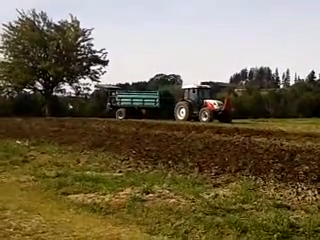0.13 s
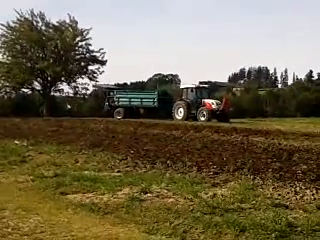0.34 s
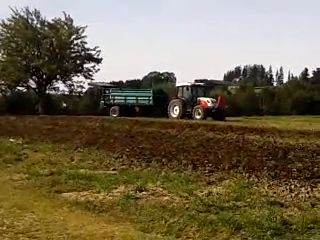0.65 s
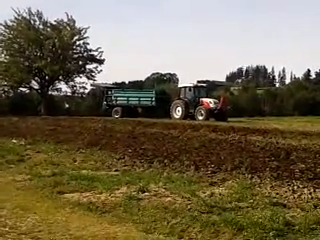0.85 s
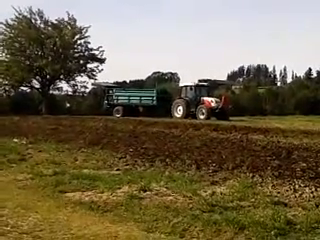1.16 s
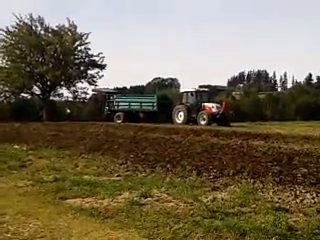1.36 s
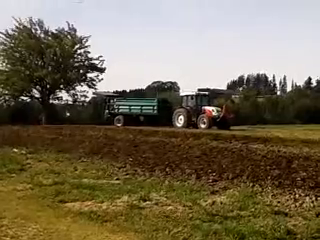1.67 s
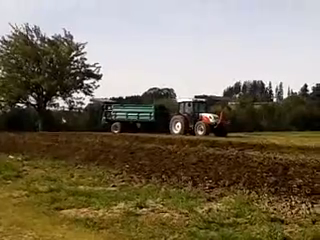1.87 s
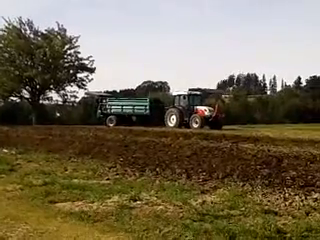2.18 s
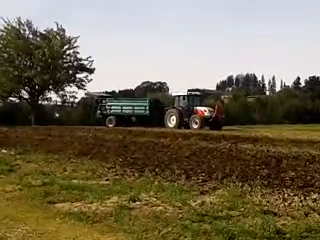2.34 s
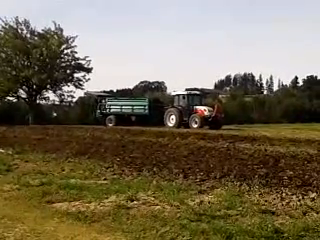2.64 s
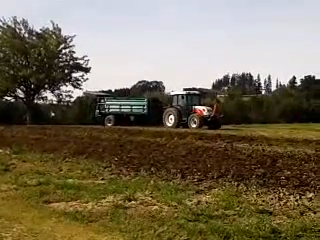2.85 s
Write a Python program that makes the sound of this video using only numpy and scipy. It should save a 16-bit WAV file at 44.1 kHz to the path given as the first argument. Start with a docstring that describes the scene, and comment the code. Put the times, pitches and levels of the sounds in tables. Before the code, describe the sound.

Tractor diesel chugging fast with rattling metal knock, whirring machinery and low rumble in a field.

```python
"""A diesel tractor pulling a spreader: harmonics make the exhaust thud, shaped noise the gas and knock.
At first the engine speeds up, and a few bright pings, decaying sines, sound among the knocks.
Then it runs faster and the bright knock fades; as the engine slows, the knock hardens again into many pings.
Throughout, filtered noise makes light ticks between firings, a steady whirr, a flickering hiss and a low rumble."""
import sys
import numpy as np
from scipy.fft import rfft, irfft, next_fast_len
from scipy.io import wavfile
from scipy.ndimage import map_coordinates

SR = 44100
rng = np.random.default_rng(int(sys.argv[2]) if len(sys.argv) > 2 else 0)


def file_out(sig):
    """Save sig as 16-bit WAV at sys.argv[1]."""
    # one column per channel
    cols = np.atleast_2d(sig).T
    # limit, then scale
    lim = np.clip(cols, -1, 1)
    pcm = np.round(lim * 32767).astype(np.int16)
    wavfile.write(sys.argv[1], SR, pcm)


N = 132741  # samples


def amp(db):
    """Decibel law: level in dB to amplitude ratio."""
    return 10 ** (np.asarray(db) / 20)


def unit(x):
    """Normalisation to a root-mean-square of 1."""
    return x / np.sqrt(np.mean(x ** 2) + 1e-20)


def curves(rows):
    """Linear interpolation in time: one value per sample for each column after the time."""
    seconds, *columns = np.transpose(rows)
    return [np.interp(np.arange(N) / SR, seconds, column) for column in columns]


def wobble(rate):
    """Slow random fluctuation: a smooth curve through `rate` random knots a second."""
    knots = rng.standard_normal(int(N * rate / SR) + 4)
    return map_coordinates(knots, [np.arange(N) * rate / SR])


def filtered(x, response):
    """Linear filtering: the spectrum of x times a response of frequency in Hz."""
    size = next_fast_len(N + SR // 2)  # zero padding keeps the filter's tail from wrapping round
    return irfft(rfft(x, size) * response(np.fft.rfftfreq(size, 1 / SR)), size)[:N]


def coloured(x, points):
    """Spectral shaping: x through a curve of (Hz, dB) on a logarithmic frequency axis."""
    f, db = np.transpose(points)
    return filtered(x, lambda hz: amp(np.interp(np.log(hz + 1), np.log(f + 1), db)))


def noise(points):
    """Coloured noise of rms 1: a random signal with a shaped spectrum."""
    return unit(coloured(rng.standard_normal(N), points))


JITTER_S = 0.00013  # random spread of each burst's start


def bursts(times, attack_s, hold_s, release_s, scatter_db):
    """Transient envelope of rms 1: unequal rises, holds and exponential decays, added as powers."""
    t = np.arange(N) / SR
    power = np.zeros(N)
    for start, (size, shift) in zip(times, rng.standard_normal((len(times), 2))):
        near = slice(*np.searchsorted(t, [start - .01, start + .1]))
        age = t[near] - start - JITTER_S * shift
        rise = np.clip(age / attack_s, 0, 1)
        decay = np.exp(-np.maximum(age - attack_s - hold_s, 0) / release_s)
        power[near] += (amp(scatter_db * size) * rise * decay) ** 2
    return unit(np.sqrt(power))


# Engine speed. Each row: time in seconds, rate in firings per second.
ENGINE_SPEED = [(0.0, 21.38), (0.15, 23.35), (0.38, 26.55), (0.7, 26.03), (1.05, 26.35), (1.4, 26.18),
                (1.65, 25.34), (1.95, 24.43), (2.5, 24.5), (3.01, 24.88)]
START_TURN = .785  # in firing periods


def engine_cycle():
    """Phase accumulation: the firing rate summed over time; a firing falls at every whole turn."""
    rate, = curves(ENGINE_SPEED)
    turns = START_TURN + np.cumsum(rate) / SR  # one turn is one firing period
    firings = np.interp(np.arange(1, int(turns[-1]) + 1), turns, np.arange(N) / SR)
    return rate, turns, firings


# Exhaust pipe resonances, which set the level of a multiple of the firing rate as it passes.
# Each row: frequency in Hz, rms level in dB before EXHAUST_DB and the waver.
PIPE_RESONANCES = [(21, -54.5), (26, -48.5), (45, -48), (47, -59), (48.7, -47.5), (50.5, -45),
                   (52.4, -51.5), (70, -52.5), (74, -55), (79, -61.5), (90, -68.5), (98, -66.5), (105, -56),
                   (122, -66), (131, -70), (152, -68), (172, -71.5), (185, -75), (198, -68), (210, -80.5),
                   (232, -63.5), (247, -76.5), (263, -66), (285, -83), (320, -81.5)]
EXHAUST_DB, EXHAUST_WAVER_DB = -0.2, 0.5
EXHAUST_LAG_TURNS = .15
PIPE_SMEAR_TURNS = 0.0447  # dispersion: the pipe delays higher multiples more


def exhaust(turns, rate, count=12):
    """Harmonic excitation of a resonant pipe: multiples of the firing rate swell at its resonances."""
    angle = 2 * np.pi * (turns - EXHAUST_LAG_TURNS)
    hz, db = np.transpose(PIPE_RESONANCES)
    thud = np.zeros(N)
    for k in range(1, count + 1):
        level_db = np.interp(k * rate, hz, db) + EXHAUST_WAVER_DB * wobble(5.6)
        smear = 2 * np.pi * PIPE_SMEAR_TURNS * k * k
        thud += amp(level_db) * np.sin(k * angle - smear)
    return -np.sqrt(2) * amp(EXHAUST_DB) * thud  # root 2 turns rms into peak


SCATTER_DB = 1  # spread of burst strength, for puffs and knock
# Spectrum of the gas that follows each firing out of the pipe.
# Each row: frequency in Hz, relative level in dB.
PUFF_SPECTRUM = [(60, -22), (130, -7.5), (170, 1), (230, -2.5), (290, -6), (400, -19), (900, -45)]
PUFF_DB = -63
PUFF_ATTACK_S, PUFF_HOLD_S, PUFF_RELEASE_S = 0.0042, .016, 0.0083


def puffs(firings):
    """Flow noise in pulses: a short, low rush of gas with every thud."""
    envelope = bursts(firings, PUFF_ATTACK_S, PUFF_HOLD_S, PUFF_RELEASE_S, SCATTER_DB)
    return amp(PUFF_DB) * noise(PUFF_SPECTRUM) * envelope


# Combustion knock over time. Each row: time in seconds, level in dB of the clatter before
# KNOCK_DB, gain in dB of the metal's ring.
KNOCK_LEVELS = [(0, -51, 1.5), (.2, -50, 1.5), (.45, -51.5, -4), (1.0, -53, -2.5), (1.4, -51.5, 0),
                (1.8, -51, 0.5), (2.5, -52.5, 1), (3.01, -51.5, 0.5)]
# Spectrum of the clatter. Each row: frequency in Hz, relative level in dB.
KNOCK_SPECTRUM = [(290, -23.5), (500, -16.5), (695, -14), (980, -12.5), (1210, 2.5), (1380, 0.5),
                  (1530, -3), (1800, 0.5), (2400, 6), (2650, 0), (3000, 1), (3390, -4), (4210, 3),
                  (4650, -0.5), (5200, -8), (5980, -23.5), (7010, -30), (7500, -34.5), (9750, -66),
                  (16500, -120)]
# Edges of the bands in which the panels rattle, in Hz.
PANEL_EDGES = [0, 1700, 2700, 3900, 20000]
# Resonances of the engine's metal. Each row: frequency in Hz, width in Hz, level in dB before the ring gain.
METAL_MODES = [(225, 12, -70.5), (264.3, 7.7, -71), (628.8, 8.2, -69), (707.7, 27, -63.5), (845, 72, -72),
               (1137, 53, -66), (1192, 6.4, -69.5), (1427, 40, -61), (1620, 82, -67), (2050, 14, -66),
               (2230, 55, -61), (2333, 41, -62), (3425, 25, -57.5), (3504, 62, -55), (3713, 97, -73.5),
               (4060, 110, -63.5), (4660, 62, -74), (5180, 40, -68)]
KNOCK_DB, GRAIN_DB = 2.5, 0.33
KNOCK_LEAD_S, ATTACK_S, HOLD_S, RELEASE_S = 0.002, 0.0045, 0.0072, 0.0093
SHAKE = 0.28  # constant excitation of the metal, beside strokes of rms 1


def knock(firings):
    """Impact excitation: firings rattle panels in separate bands and ring the metal's resonances."""
    level_db, ring_db = curves(KNOCK_LEVELS)
    grain = amp(GRAIN_DB * wobble(600))
    rattle = noise(KNOCK_SPECTRUM)

    def stroke():
        """Independent amplitude modulation: one envelope of unequal strokes."""
        return unit(grain * bursts(firings - KNOCK_LEAD_S, ATTACK_S, HOLD_S, RELEASE_S, SCATTER_DB))

    clatter = np.zeros(N)
    for low, high in zip(PANEL_EDGES, PANEL_EDGES[1:]):
        panel = filtered(rattle, lambda hz: (hz >= low) & (hz < high))
        clatter += stroke() * panel

    drive = (stroke() + SHAKE) * rng.standard_normal(N)
    ring = np.zeros(N)
    for hz, width, db in METAL_MODES:
        mode = filtered(drive, lambda f: 1j * f * width / (hz * hz - f * f + 1j * f * width))
        ring += amp(db) * unit(mode)
    return amp(level_db + KNOCK_DB) * clatter + amp(ring_db) * ring


# Hard knock under load. Each row: time in seconds, level in dB.
HARD_LEVELS = [(0, -47), (.25, -52), (.45, -60), (1.2, -65), (1.8, -50), (2.1, -51), (2.45, -46),
               (2.8, -47), (3.01, -48.5)]
# Spectrum of the hard knock. Each row: frequency in Hz, relative level in dB.
HARD_SPECTRUM = [(250, -42), (420, -19), (560, -18.5), (700, -7.5), (800, -20), (950, -13.5), (1300, -28),
                 (2600, -25), (2900, 2), (3250, -9), (3400, -4.5), (3550, -5.5), (3700, 3.5), (3850, -15.5),
                 (4100, -11), (4450, -8), (4700, -13), (4950, -9), (5200, -25), (5800, -14), (6500, -26.5)]
HARD_LEAD_S, HARD_ATTACK_S, HARD_HOLD_S, HARD_RELEASE_S = 0.0055, 0.0087, 0.0026, 0.022
HARD_SCATTER_DB = 1


def hard_knock(firings):
    """Modulated noise: a bright burst with a longer decay begins just ahead of the clatter."""
    level_db, = curves(HARD_LEVELS)
    envelope = bursts(firings - HARD_LEAD_S, HARD_ATTACK_S, HARD_HOLD_S, HARD_RELEASE_S, HARD_SCATTER_DB)
    return amp(level_db) * noise(HARD_SPECTRUM) * envelope


# Bright metallic pings among the knocks.
# Each row: start in seconds, level in dB before partial and envelope, pitch in Hz.
PING_STRIKES = [(.009, -33, 3030), (.057, -34, 3750), (.187, -38.5, 2910), (.2254, -33, 3240),
                (1.763, -34, 3110), (1.8854, -31.5, 2923), (2.0515, -29.5, 3580), (2.0902, -30.5, 3190),
                (2.1745, -35.5, 3520), (2.215, -32, 3300), (2.2524, -35.5, 3260), (2.375, -32.5, 3670),
                (2.4158, -27, 3410), (2.5017, -40, 3640), (2.5399, -26.5, 3160), (2.5797, -28, 3093),
                (2.7024, -27, 2905), (2.7416, -33, 3220), (2.827, -38, 3470), (2.865, -29.5, 2926)]
# Partials of a ping. Each row: frequency as a ratio to the pitch, relative level in dB.
PING_PARTIALS = [(1.003, 5), (1.13, -20.5), (1.66, -13)]
# Spectrum of the broad knock that follows each ping. Each row: frequency in Hz, relative level in dB.
JOLT_SPECTRUM = [(600, -13.5), (1300, -3), (2400, -4.5), (3500, 3), (4400, -5), (5400, -9.5), (7000, -19.5),
                 (9000, -81.5)]
PING_T60_S, PING_ATTACK_S = 0.02, 0.0007  # T60 is the time to fall by 60 dB
PING_ROUGH = 0.6  # random phase drift, in tenths of a radian per sample step
JOLT_DB, JOLT_RISE_S, JOLT_T60_S = -9, 0.0065, 0.077  # level relative to the ping's


def pings():
    """Modal decay: short inharmonic pings, each spreading into a broad jolt of the whole engine."""
    tones, jolts = np.zeros(N + SR), np.zeros(N + SR)
    t = np.arange(SR // 10) / SR
    ping_envelope = amp(-60 * t / PING_T60_S) * (1 - np.exp(-t / PING_ATTACK_S))
    jolt_envelope = amp(-60 * t / JOLT_T60_S) * (1 - np.exp(-t / JOLT_RISE_S))
    for start, db, hz in PING_STRIKES:
        first = round(start * SR)
        span = slice(first, first + len(t))
        jolts[span] += amp(db + JOLT_DB) * jolt_envelope
        for ratio, mode_db in PING_PARTIALS:
            drift = PING_ROUGH * np.cumsum(rng.standard_normal(len(t))) / 10
            tone = np.sin(2 * np.pi * hz * ratio * t + drift)
            tones[span] += amp(db + mode_db) * ping_envelope * tone
    return tones[:N] + jolts[:N] * noise(JOLT_SPECTRUM)


# Spectrum of the lighter ticks, probably the valves. Each row: frequency in Hz, relative level in dB.
VALVE_SPECTRUM = [(800, -24.5), (1400, -6.5), (2250, -5), (2800, -8), (3500, -6), (4500, -3), (5200, -11),
                  (6500, -30.5), (9000, -80)]
VALVE_DB, VALVE_SCATTER_DB = -60.5, 4
VALVE_DELAY_S, VALVE_ATTACK_S, VALVE_HOLD_S, VALVE_RELEASE_S = 0.02734, .0015, .001, .003


def valves(firings):
    """Impact noise: a short, uneven tick falls between each firing and the next."""
    ticks = bursts(firings + VALVE_DELAY_S, VALVE_ATTACK_S, VALVE_HOLD_S, VALVE_RELEASE_S, VALVE_SCATTER_DB)
    return amp(VALVE_DB) * noise(VALVE_SPECTRUM) * ticks


# Spectra of the machinery's whirr, hiss and rumble. Each row: frequency in Hz, relative level in dB.
WHIRR_SPECTRUM = [(180, -42.5), (300, -18.5), (514, -16), (701, -7.5), (960, -13.5), (1380, -9),
                  (1530, -9.5), (1800, -8.5), (3130, -7.5), (3530, -4), (4500, -9.5), (5200, -20),
                  (6050, -14.5), (6920, -14.5), (7500, -49), (9750, -52.5), (16500, -120)]
HISS_SPECTRUM = [(2000, -23), (3300, -9), (4100, -5), (4600, 2.5), (5000, -15.5), (6000, -22)]
RUMBLE_SPECTRUM = [(15, 1.5), (36, -1.5), (60, 2.5), (88, -2), (125, -3.5), (160, -4), (200, -14.5),
                   (245, -11.5), (300, -14.5), (350, -14.5), (450, -18), (900, -33.5)]
# Rumble over time. Each row: time in seconds, level in dB.
RUMBLE_LEVELS = [(0, -54), (.7, -55.5), (1.2, -54.5), (1.7, -50), (2.2, -54), (3.01, -50)]
WHIRR_DB, HISS_DB, HISS_FLICKER_DB = -49, -59, 2.6


def running_gear():
    """Broadband noise: whirr and flickering hiss of gears, fan and spreader over a low rumble."""
    rumble_db, = curves(RUMBLE_LEVELS)
    whirr = amp(WHIRR_DB) * noise(WHIRR_SPECTRUM)
    hiss = amp(HISS_DB + HISS_FLICKER_DB * wobble(30)) * noise(HISS_SPECTRUM)
    rumble = amp(rumble_db) * noise(RUMBLE_SPECTRUM)
    return whirr + hiss + rumble


def scene():
    """Superposition: the firing-timed sounds add to the pings and the running gear."""
    rate, turns, firings = engine_cycle()
    gas = exhaust(turns, rate) + puffs(firings)
    strokes = knock(firings) + hard_knock(firings) + pings() + valves(firings)
    return (gas + strokes + running_gear())[None]


# Treble response of the whole sound. Each row: frequency in Hz, gain in dB.
TREBLE_RESPONSE = [(20, 0), (4500, 0), (5650, 0.5), (6150, -21), (6600, -7.5), (7100, -1.5), (7500, -12.5)]
TOP_HZ = 7957


def record(dry):
    """Band limiting: a dull sound with a notch in the treble and nothing above TOP_HZ."""
    shaped = coloured(dry[0], TREBLE_RESPONSE)
    return filtered(shaped, lambda hz: hz < TOP_HZ)[None]


dry = scene()
out = record(dry)
file_out(out)
```